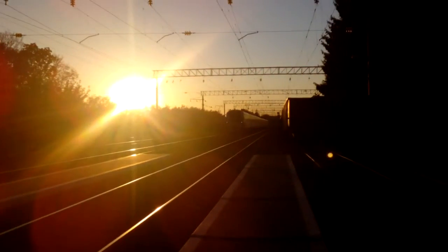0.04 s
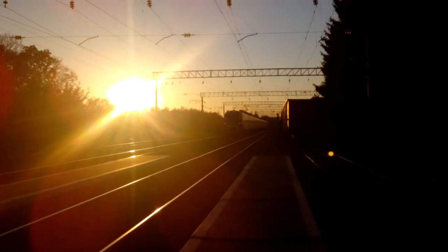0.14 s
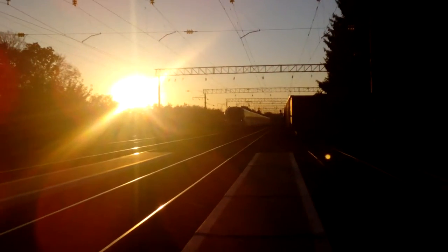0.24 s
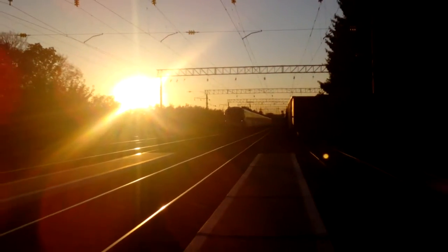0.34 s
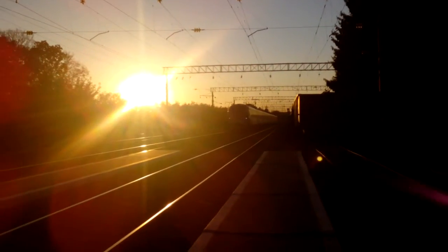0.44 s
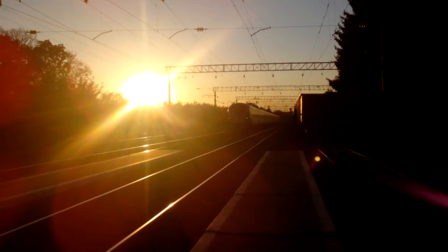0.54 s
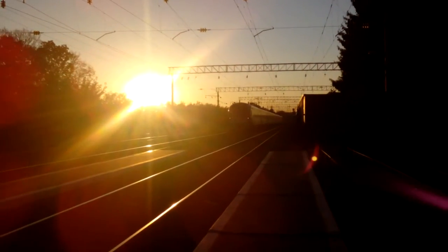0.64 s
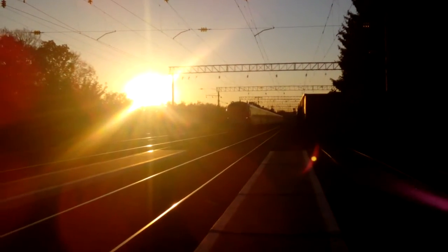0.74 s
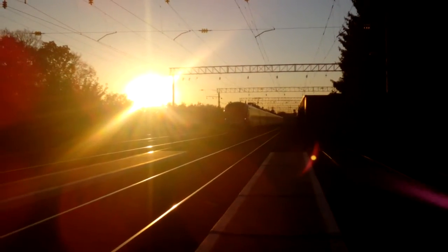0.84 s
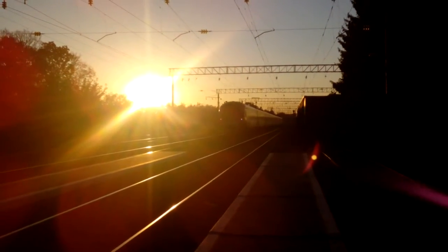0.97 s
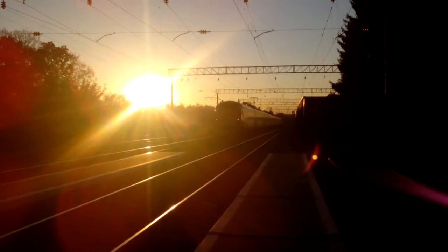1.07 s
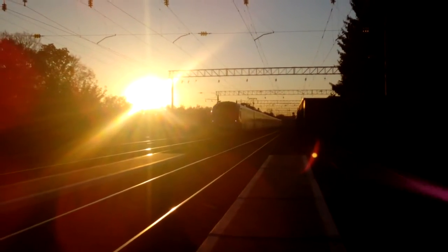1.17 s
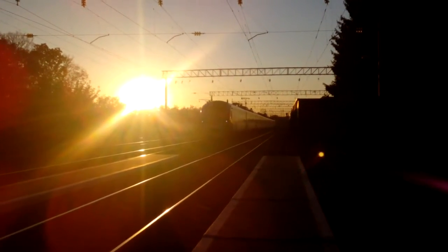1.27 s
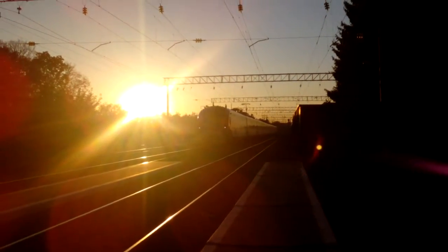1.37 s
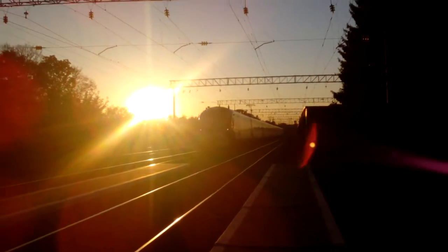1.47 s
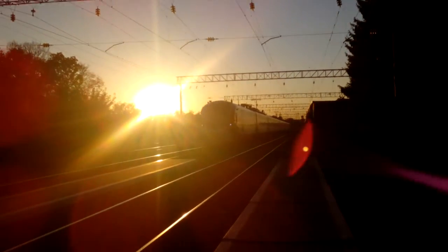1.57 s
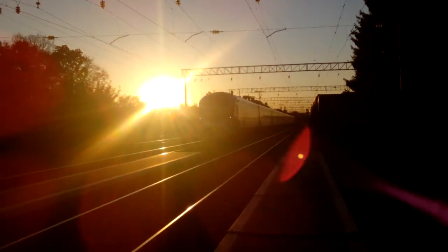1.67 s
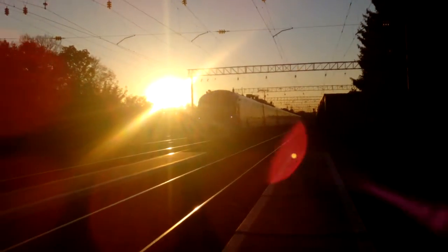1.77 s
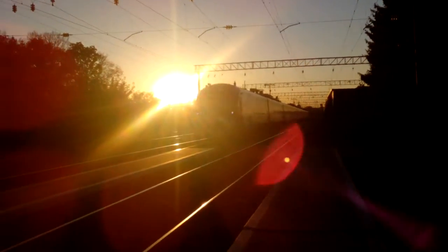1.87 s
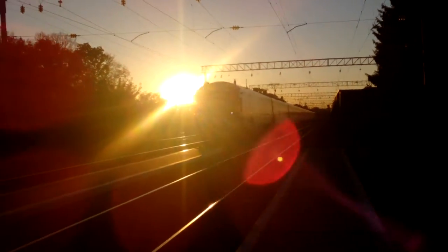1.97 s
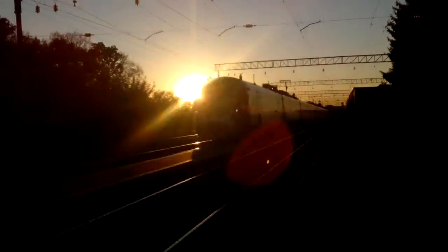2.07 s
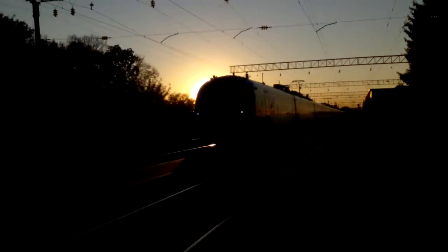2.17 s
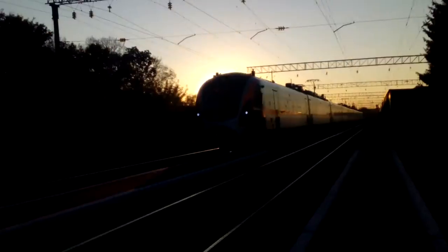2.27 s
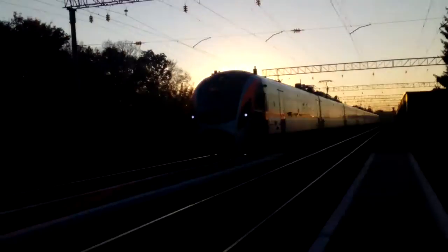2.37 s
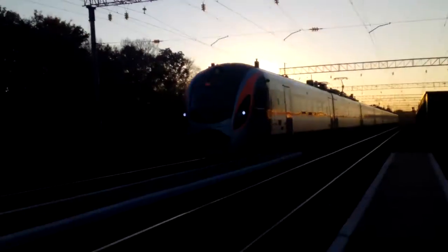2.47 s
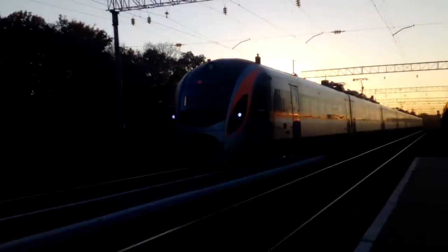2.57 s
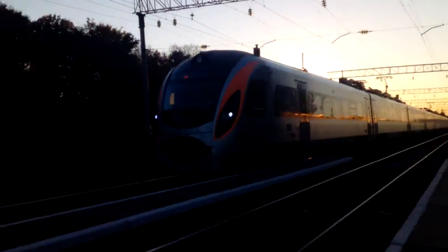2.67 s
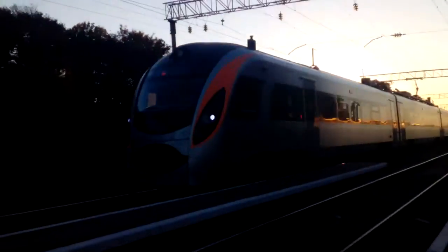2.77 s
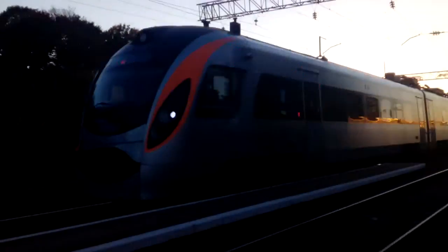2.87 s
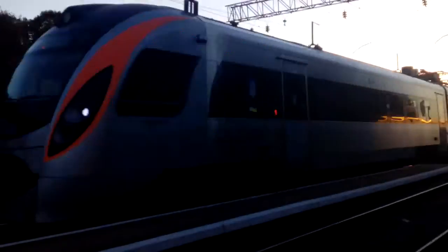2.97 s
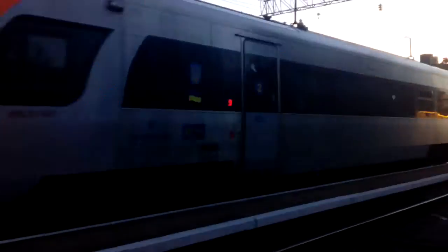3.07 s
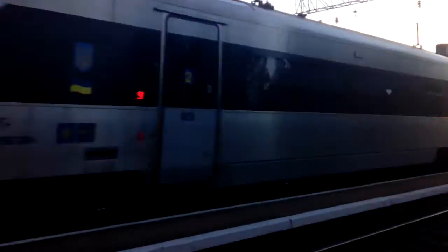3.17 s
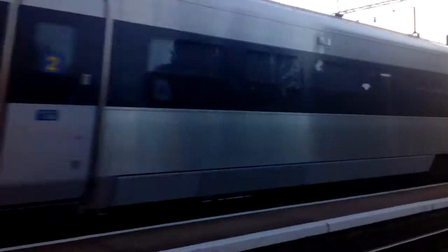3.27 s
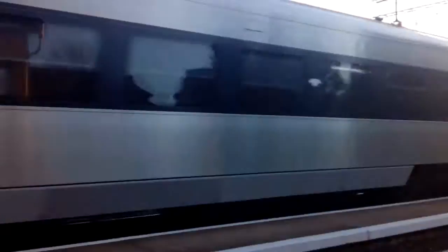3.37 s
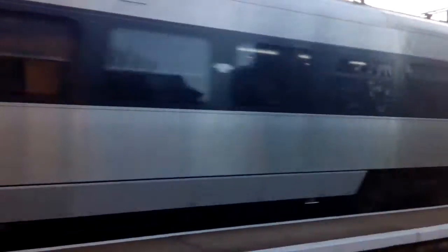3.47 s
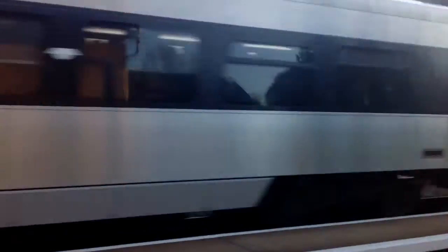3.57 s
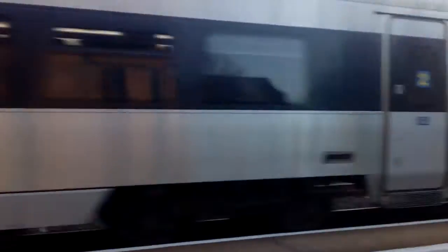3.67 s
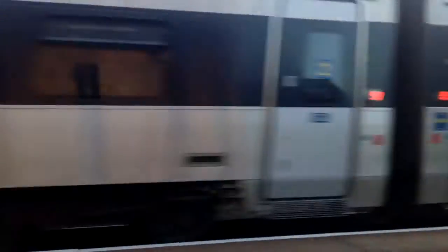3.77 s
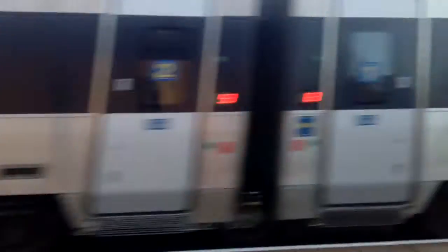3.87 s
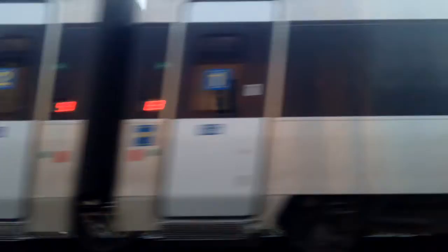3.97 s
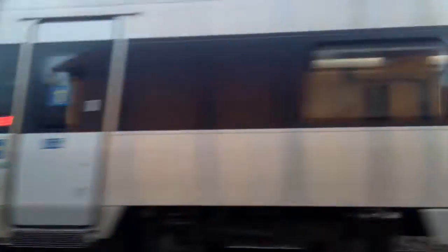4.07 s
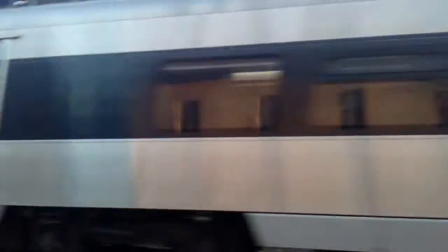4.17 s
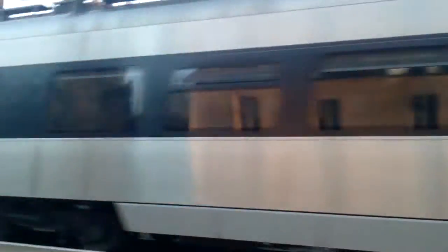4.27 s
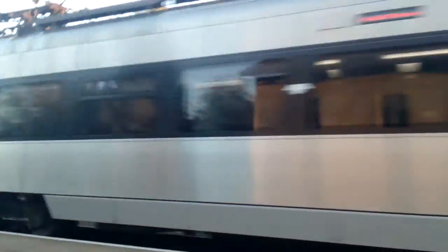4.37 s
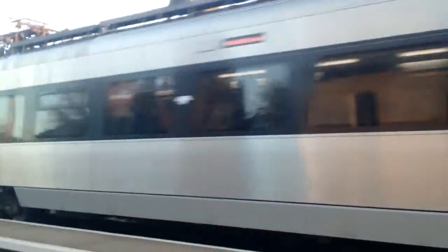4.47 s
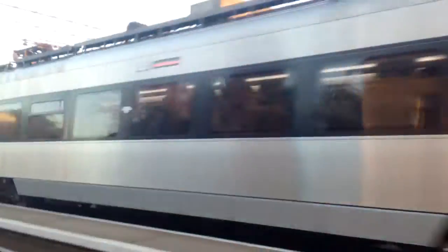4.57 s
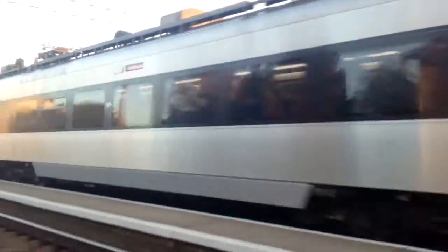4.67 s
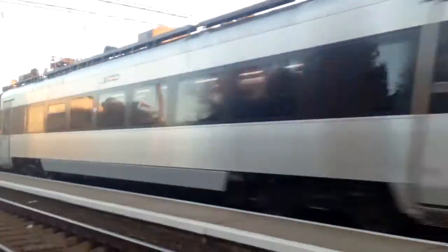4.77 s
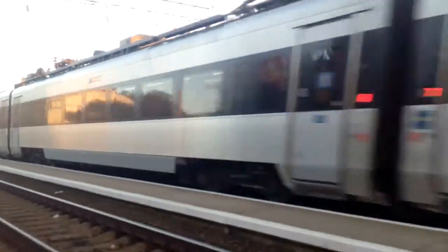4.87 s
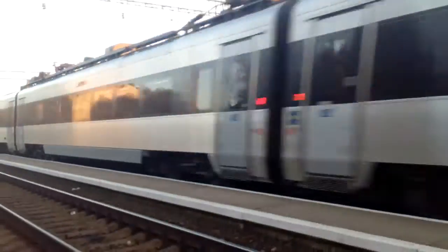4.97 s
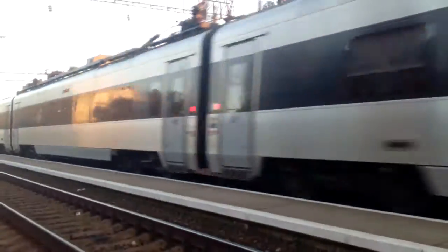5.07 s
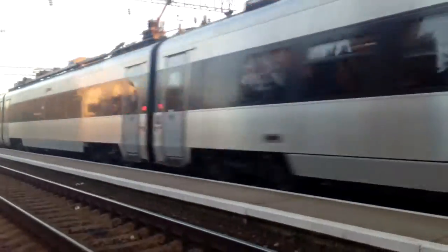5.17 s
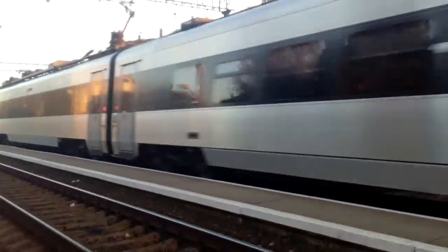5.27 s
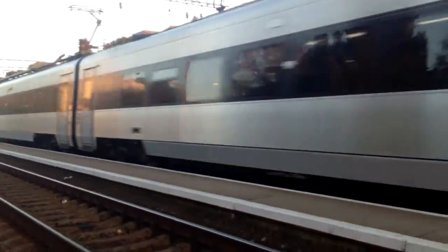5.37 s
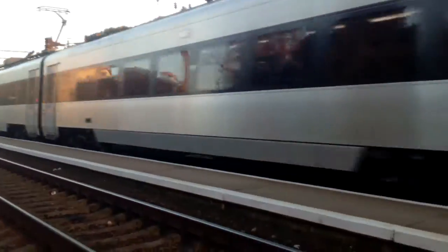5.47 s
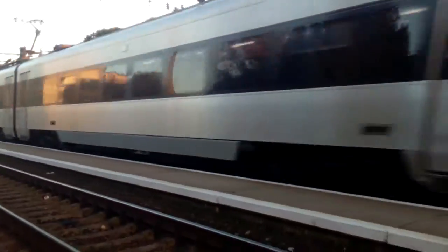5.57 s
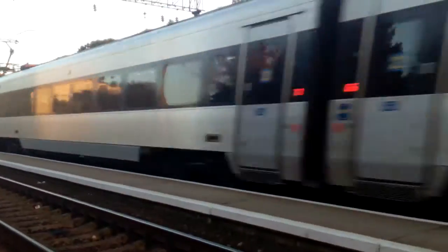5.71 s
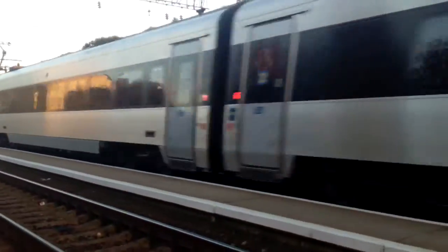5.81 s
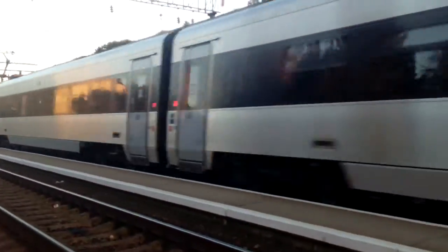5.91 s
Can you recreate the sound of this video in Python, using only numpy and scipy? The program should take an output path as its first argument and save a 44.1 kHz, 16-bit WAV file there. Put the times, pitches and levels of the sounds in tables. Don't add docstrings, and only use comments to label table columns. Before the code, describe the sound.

Quiet rail hiss and far-off axle knocks swell quickly into a loud, close train pass with rolling roar, paired clacks and metallic ringing.

```python
import sys
import numpy as np
from scipy import signal
from scipy.fft import rfft, irfft, next_fast_len
from scipy.io import wavfile
from scipy.ndimage import uniform_filter1d, map_coordinates

SR = 44100
rng = np.random.default_rng(int(sys.argv[2]) if len(sys.argv) > 2 else 0)


def to_linear_factor(level_db):
    exponent = np.asarray(level_db, float) / 20
    return 10 ** exponent


def unload_wav(signal):
    wavfile.write(
        sys.argv[1],
        SR,
        np.round(np.clip(np.atleast_2d(signal).T, -1, 1) * 32767).astype(np.int16),
    )


N = 262031

# time in seconds, roar of the rails in dB.
RAIL_ROAR = [(0, -46.5), (.6, -44.5), (1.16, -42), (1.32, -38.5), (1.6, -38.5), (2.3, -34), (2.5, -30),
             (2.7, -28), (3.0, -22), (3.15, -19.5), (3.4, -18.5), (3.75, -18), (4.15, -17), (4.55, -16.5),
             (4.9, -16.5), (5.3, -17), (5.6, -17.5), (5.94, -16)]
FULL_ROAR_DB = -17

# time in seconds, lag of the right port in samples.
PORT_LAG = [(0, -6.5), (3.2, -1.5), (3.5, 1), (4.05, 4), (4.45, 18), (5.94, 15.5)]

# load in dB, knock in dB, rattle in dB.
AXLE_LOADS = [(3, -3, 0), (1.5, 0, .5), (2, -1.5, -2), (-0.5, -1.5, -.5), (-1, 1, 2), (-1.5, -2.5, 2.5),
              (1, -2.5, -4.5), (0.5, 1, 2), (.5, 4, 2.5), (0, 1.5, 1.5), (-0.5, 2.5, -1), (.5, 1.5, .5),
              (0, 3, 1), (0, 3.5, 1)]


def unit(x):
    return x / np.sqrt(np.mean(x ** 2) + 1e-20)


def along(points, hz):
    f, v = np.transpose(points)
    return np.interp(np.log(hz + 1), np.log(f + 1), v)


def curves(rows):
    s, *columns = np.transpose(rows)
    return [np.interp(np.arange(N) / SR, s, column) for column in columns]


def wobble(rate):
    knots = rng.standard_normal(int(N * rate / SR) + 4)
    return map_coordinates(knots, [np.arange(N) * rate / SR])


def shares():
    # time in seconds, share of the sound from alongside (0-1).
    nearness = [(0, 0.09), (1.8, 0.21), (2.6, 0.64), (3.2, 0.98), (5.94, 0.93)]
    near = np.clip(curves(nearness)[0], 0, 1)
    return np.array([1 - near, near])[:, None]


def rush(spectrum, stage, patchy_db):
    # frequency in Hz, left-right likeness (0-1).
    likeness = [
        [(60, 1), (300, 1), (600, 0.67), (900, 0.9), (1200, 0.263), (1700, 0.42), (2100, 0.9), (4000, 0.85), (6300, 1), (7500, 0.18), (15000, .1)],
        [(60, 0.9), (200, 0.977), (500, 0.795), (1000, 0.466), (1500, 0.066), (2200, 0.128), (4000, 0.033), (8000, 0.047), (15000, .02)],
    ]
    # frequency in Hz, left minus right in dB.
    left_lean = [
        [(60, 2.5), (110, 2), (200, 1.5), (380, 1), (700, 1), (1290, -1), (2380, 4), (4400, 0), (8120, -2.5), (15000, 26)],
        [(60, 0.5), (110, 0), (200, 2), (380, 2), (700, 0.0), (1290, 0.5), (2380, 5), (4400, 1), (8120, 0), (15000, 61.5)],
    ]
    # frequency in Hz, lead of the left port in radians.
    port_lead = [
        [(0, 5), (780, -1), (1030, -1.5), (1980, -6), (2500, -7.5), (6200, -5), (6980, -5), (8530, -16), (8870, -0.5), (9470, -15), (9820, 3), (10900, -11.5), (12600, -19.5), (15300, -26)],
        [(0, 0), (15000, 0.001)],
    ]
    z = signal.stft(rng.standard_normal((2, N)), nperseg=512)[2]
    field = uniform_filter1d(rng.standard_normal(z.shape[1:]), size=5, axis=0)
    field = uniform_filter1d(field, size=12, axis=1)
    patchy = signal.istft(z * to_linear_factor(patchy_db * unit(field)), nperseg=512)[1][:, :N]
    size = next_fast_len(N)
    hz = np.fft.rfftfreq(size, 1 / SR)
    turn = np.arccos(np.clip(along(likeness[stage], hz), 0, 1)) / 2
    shared, apart = rfft(patchy, size) * to_linear_factor(along(spectrum, hz)) * [np.cos(turn), np.sin(turn)]
    skew = to_linear_factor(along(left_lean[stage], hz) / 2) * np.exp(.5j * along(port_lead[stage], hz))
    ports = irfft(np.array([(shared + apart) * skew, (shared - apart) / skew]), size)[:, :N]
    return ports / np.std(ports.mean(0))


def passing(far_spectrum, near_spectrum, patchy_db):
    return np.sqrt(shares()) * [rush(far_spectrum, 0, patchy_db), rush(near_spectrum, 1, patchy_db)]


def axle_times():
    first_axle_s, car_s, bogie_s, wheelbase_s = 3.196, .7955, .510, .083
    k = np.arange(len(AXLE_LOADS))
    return first_axle_s + car_s * (k // 4) + bogie_s * (k // 2 % 2) + wheelbase_s * (k % 2)


def part_db(name):
    part_levels = {"ground": (-26, 0.6621, 4, 0.33, -2), "rail": (-17, 1.0443, -3.4, 4.2, 0.22),
                   "wheel": (-32, 0.7558, 3.5, -0.03, -.5), "air": (-52, 0.66, 4, 0.9, -.5),
                   "sleeper": (-29, 0.98, 0.5, 2.02, -2), "span": (-27, 0.804, 3.5, -1.2, -10),
                   "web": (-30.5, 0.72, 1.5, 1.2, 2.5), "disc": (-54, 0.35, 3, -4.33, 2)}
    reach_s = 0.1102
    db, grows, bogie_db, lag, behind_db = part_levels[name]
    t = np.arange(0, N, 64) / SR
    near = np.sum(1 / (1 + ((t[:, None] - axle_times() - lag) / reach_s) ** 2), axis=1) / 2
    bogies = np.interp(np.arange(N) / SR, t, near)
    turn = curves(PORT_LAG)[0]
    behind = (turn - turn.min()) / np.ptp(turn)
    roar = grows * (curves(RAIL_ROAR)[0] - FULL_ROAR_DB)
    return db + roar + bogie_db * bogies + behind_db * behind


def rolling():
    # frequency in Hz, level in dB per Hz.
    ground_colour = [
        [(15, -51), (25, -15), (38, -1), (51, -21), (70, 8), (108, -8.5), (227, -2), (300, -12.5), (390, -5), (660, -120)],
        [(15, -45), (25, -7.5), (53, -5.5), (108, 1), (156, 3), (206, -4), (246, -3), (300, -14), (390, -57.5), (660, -120)],
    ]
    rail_colour = [
        [(140, -29.5), (230, -6.5), (311, -1), (463, -7.5), (559, -7.5), (648, -1.5), (815, -6.5), (886, 0), (954, -4.5), (1310, -1), (1660, -8), (2050, -9.5), (2440, -21.5), (2800, -24.5), (3640, -80), (6160, -120)],
        [(140, -51.5), (230, -8), (296, -14), (392, -3), (634, -5.5), (944, -0.5), (1580, -12), (1860, -11), (2200, -18.5), (2800, -24.5), (3640, -30), (6160, -120)],
    ]
    wheel_colour = [
        [(1350, -15.5), (2300, 6.5), (2470, 3), (3060, 2), (3750, 2), (4600, -1), (5400, -3.5), (6240, -5), (7580, -44), (8300, -66), (10800, -67), (18300, -120)],
        [(1350, -9), (2300, -1), (3370, -3.5), (4000, 0), (4960, -2.5), (6480, -6.5), (8300, -24.5), (10800, -48.5), (18300, -120)],
    ]
    air_colour = [
        [(4650, -31), (7900, -14), (8440, -5.5), (10000, 7.5), (12000, -0.5), (12900, -5.5), (14300, -8.5), (15000, -18), (15300, -24)],
        [(4650, -15), (7900, -2), (8250, 13), (10500, 13.5), (11900, -9), (13900, -13), (15100, -14.5)],
    ]
    sway = wobble(9.9)
    lumps = .8 * wobble(12)
    ground = to_linear_factor(part_db("ground") + lumps) * passing(*ground_colour, patchy_db=0.0)
    swell = .2 * sway + .4 * wobble(6)
    rail = to_linear_factor(part_db("rail") + swell) * passing(*rail_colour, patchy_db=0.7358)
    wheel_db = part_db("wheel") + 0.84 * sway + 0.4 * wobble(23)
    wheel = to_linear_factor(wheel_db) * passing(*wheel_colour, patchy_db=1.24)
    air_loss_db = .5 * to_linear_factor(FULL_ROAR_DB - curves(RAIL_ROAR)[0])
    air_db = part_db("air") - air_loss_db + 0.74 * sway + 1.25 * wobble(30)
    air = to_linear_factor(air_db) * passing(*air_colour, patchy_db=3.0)
    return ground + rail + wheel + air


def track():
    # time in seconds, length in seconds,
    # sleeper level in dB, span level in dB, web level in dB.
    rough_rail = [(1.28, 0.025, -63.5, -36, -42), (1.365, 0.0137, -56, -36.5, -48.5),
                  (2.366, 0.078, -35, -56, -44), (3.212, 0.117, -29.5, -22, -34),
                  (3.432, 0.064, -24.5, -40, -40), (3.726, 0.0276, -20, -16.5, -28),
                  (3.931, 0.031, -20.5, -22.5, -28.5), (4.383, 0.127, -44.5, -36, -20.5),
                  (4.717, 0.074, -21, -46, -45), (4.807, 0.0183, -19, -23, -28.5),
                  (5.528, 0.028, -17, -23, -32.5), (5.598, 0.0255, -20, -22.5, -34),
                  (5.751, .1, -26.5, -24, -25)]
    # frequency in Hz, level in dB.
    sleeper_colour = [(250, -43.5), (340, -0.5), (420, 11), (520, 4.5), (650, -49.5)]
    span_colour = [(480, -69), (620, 8.5), (800, 7), (1000, 4.5), (1300, -60)]
    web_colour = [(780, -56), (950, 2.5), (1100, 5), (1450, -1), (1800, -48)]
    s, length, *levels = np.transpose(rough_rail)
    swells = np.exp(-((np.arange(N)[:, None] / SR - s) / length) ** 2)

    def ringing(name, rough_db):
        uneven_db = (1.5 + 3.15 * shares()[1, 0]) * wobble(14)
        return np.sqrt(to_linear_factor(2 * part_db(name) + uneven_db) + swells @ to_linear_factor(2 * rough_db))

    sleeper = ringing("sleeper", levels[0])
    span = ringing("span", levels[1])
    web = ringing("web", levels[2])
    return (sleeper * passing(sleeper_colour, sleeper_colour, patchy_db=2)
            + span * passing(span_colour, span_colour, patchy_db=-1.5)
            + web * passing(web_colour, web_colour, patchy_db=1.39))


def blows():
    # time in seconds, thump in dB, knock in dB,
    # rattle in dB.
    far_points = [(0.1, -35, -60, -67.5), (0.243, -41.5, -30, -41.5), (0.329, -39, -37, -52),
                  (0.451, -32, -53, -63.5), (0.538, -37, -47, -60), (0.791, -32.5, -38.5, -66.5),
                  (0.929, -34.5, -40.5, -53), (1.059, -33, -54, -60.5), (1.17, -33, -46.5, -61),
                  (1.272, -34.5, -31.5, -33.5), (1.358, -30, -34.5, -40), (1.522, -32.5, -52, -65),
                  (1.778, -43, -27.5, -42.5), (1.979, -35, -39.5, -41.5), (2.079, -37, -45, -45.5),
                  (2.176, -32, -41.5, -61), (2.328, -33.5, -22.5, -37.5), (2.41, -35.5, -24.5, -33),
                  (2.489, -32, -31.5, -38), (2.639, -26.5, -21, -32), (2.72, -27, -17, -32.5)]
    # seconds after the nearest joint, thump in dB, thump pitch in Hz,
    # knock in dB, rattle in dB.
    near_joints = [
        (-.235, -18, 154.7, -20, -34),
        (0, -9, 136.8, -12, -23.5),
        (.201, -16, 106.9, -15.5, -25.5),
    ]
    far, near = [], []
    for s, thump, knock, rattle in far_points:
        hz = 81.6 + 45 * to_linear_factor(2 * (rattle + 31))
        far.append((s, thump, hz, knock, rattle, rattle - 24.5))
    for lag, thump, hz, knock, rattle in near_joints:
        for s, (load, more, loose) in zip(axle_times(), AXLE_LOADS):
            if s + lag < N / SR:
                tick = -40.5 + 1.74 * (rattle + loose + 23)
                near.append((s + lag, thump + load, hz, knock + more, rattle + loose, tick))
    return far, near


def bursts(table, column, offset_db, rise, t60):
    t, rows = np.arange(SR // 4) / SR, np.array(table)
    starts = np.round(rows[:, 0] * SR).astype(int)
    kicks = np.bincount(starts, to_linear_factor(2 * (rows[:, column] + offset_db)), N)
    shape = (1 - np.exp(-(t / rise) ** 2)) * to_linear_factor(-60 * t / t60)
    return np.abs(signal.fftconvolve(kicks, (shape / shape.max()) ** 2)[:N])


def singing():
    # frequency in Hz, level in dB.
    disc_colour = [(3300, -39.5), (3700, 6.5), (3950, 11.5), (4300, -15), (4800, -56)]
    # time in seconds, level in dB.
    flange_squeals = [
        (2.962, -33.5),
        (3.12, -34.5),
        (3.29, -35),
        (4.07, -36.5),
        (4.81, -32.5),
        (5.31, -36.5),
    ]
    flare = bursts(blows()[1], 4, -17, rise=0.0075, t60=0.25)
    squeal = bursts(flange_squeals, 1, 0, rise=0.0082, t60=0.22)
    hum = to_linear_factor(2 * part_db("disc"))
    return np.sqrt(flare + squeal + hum) * passing(disc_colour, disc_colour, patchy_db=2.5)


def thumps(table, delay, cycles, sag):
    thump, t = np.zeros(N + SR), np.arange(SR // 8) / SR - delay
    phases = 0.087 + 0.121 * rng.standard_normal(len(table))
    for (s, db, hz, *_), phase in zip(table, phases):
        u = t * hz / cycles
        swell = np.exp(-u ** 2 * np.where(u < 0, 2.2, .8))
        swing = swell * np.sin(2 * np.pi * (hz * t * (1 - sag * np.tanh(u)) + phase))
        thump[round(s * SR):][:len(t)] += to_linear_factor(db) * swing
    rebound = np.interp(np.arange(N) - 0.02136 * SR, np.arange(N), thump[:N])
    thump = thump[:N] - to_linear_factor(-8) * rebound
    return shares() * thump * to_linear_factor([[.7], [-.7]])


def axles():
    # frequency in Hz, level in dB.
    knock_colour = [(200, -9.5), (300, -4), (420, 1), (900, -10.5), (1500, -14), (2500, -25), (3000, -76)]
    rattle_colour = [(1800, -36), (2600, 1.5), (3500, 0.5), (3950, 3.5), (5000, 1.5), (6300, -3.5),
                     (7800, -14), (8400, -60)]
    tick_colour = [(7000, -50), (8400, 5.5), (10300, 0), (12500, -7), (14800, -16.5), (15500, -40)]
    far, near = blows()
    knock = bursts(far, 3, -9.5, rise=0.0104, t60=0.14) + bursts(near, 3, -3, rise=0.00832, t60=0.1723)
    rattle = bursts(far, 4, -6.0, rise=0.00245, t60=0.296) + bursts(near, 4, -6.0, rise=0.0094, t60=0.42)
    far_tick = bursts(far, 5, -4.5, rise=.004, t60=.15)
    near_tick = bursts(near, 5, -3.0, rise=0.0195, t60=0.297) + bursts(near, 5, -2.2, rise=.012, t60=0.042)
    far_low = thumps(far, 0.01485, cycles=1.17, sag=0.036)
    near_low = thumps(near, 0.0121, cycles=1.104, sag=0.185)
    knocks = np.sqrt(knock) * passing(knock_colour, knock_colour, patchy_db=0.5)
    rattles = np.sqrt(rattle) * passing(rattle_colour, rattle_colour, patchy_db=1.0)
    ticks = np.sqrt([far_tick, near_tick])[:, None] * rush(tick_colour, 1, patchy_db=-4.0)
    return far_low + near_low + knocks + rattles + ticks


def scene():
    far, (left, right) = rolling() + track() + singing() + axles()
    right = map_coordinates(right, [np.arange(N) - curves(PORT_LAG)[0]], order=5, mode="nearest")
    return far + [left, right]


def low_pass(x):
    return signal.sosfilt(signal.butter(12, 15450, fs=SR, output="sos"), x)


def record(dry):
    # frequency in Hz, gain in dB.
    port_response = [(20, -9.5), (35, 1.5), (55, 0), (7300, 0), (8000, -1.5), (8200, -1), (8450, 1),
                     (9200, -1.5), (11500, -6), (13000, -11), (15200, -23.5)]
    size = next_fast_len(N)
    gain = to_linear_factor(along(port_response, np.fft.rfftfreq(size, 1 / SR)))
    heard = irfft(rfft(dry, size) * gain, size)[:, :N]
    return low_pass(np.clip(heard, -1, 1))


dry = scene()
out = record(dry)
unload_wav(out)
```